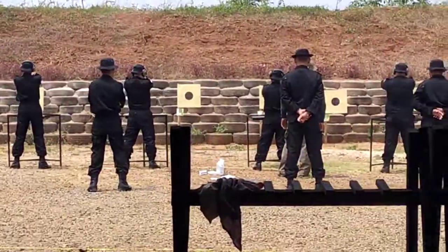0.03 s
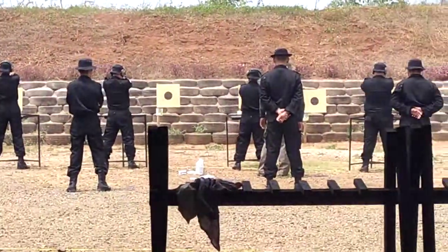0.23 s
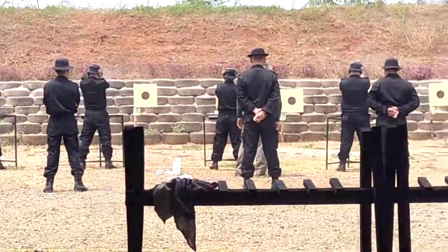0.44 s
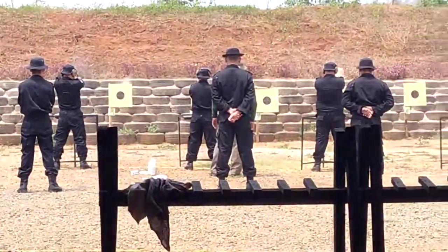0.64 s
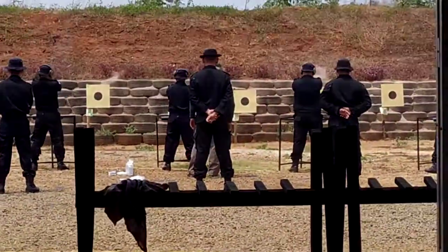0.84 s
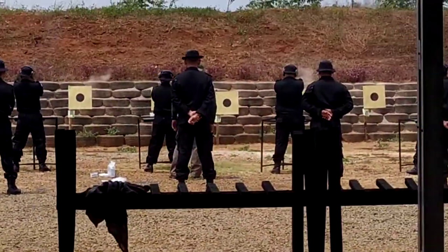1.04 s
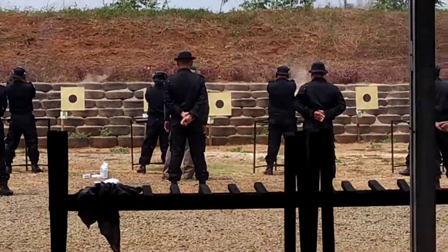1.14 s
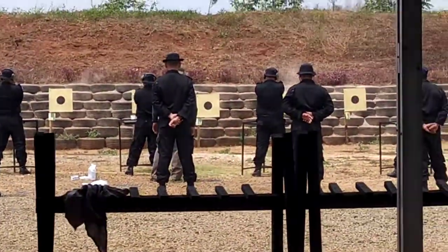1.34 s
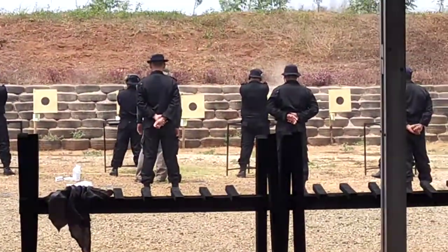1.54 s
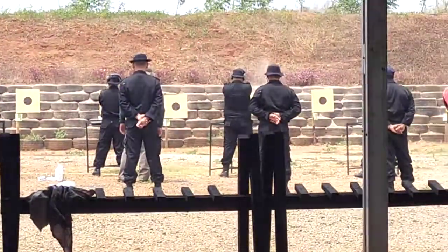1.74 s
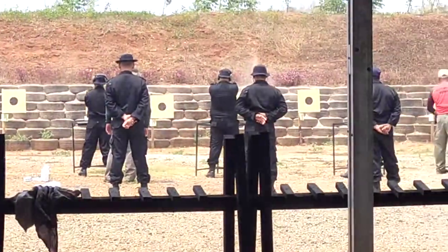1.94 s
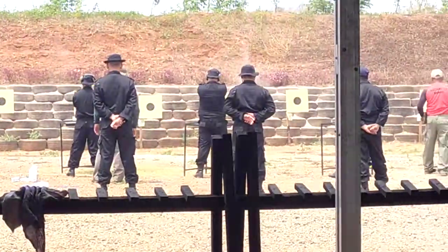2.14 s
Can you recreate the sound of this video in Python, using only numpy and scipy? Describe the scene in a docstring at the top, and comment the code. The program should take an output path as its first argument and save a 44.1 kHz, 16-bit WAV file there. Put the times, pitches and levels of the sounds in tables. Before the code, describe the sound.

Pistol shots at an outdoor range: quiet low rumble and a dying wash, then three overloaded cracks with booming thumps at about 0.23, 0.38 and 0.53 seconds. Each slaps back from the wall about 0.06 seconds later and rings the shelter. The tail fades by roughly 1 second into a low roll, with faint hiss, dull distant thuds from 1.1, thin pings, and small knocks near 1.5 and 1.7.

```python
"""Three quick pistol shots at an outdoor range, heard from under a shelter behind the firing line.
Each is a noise crack and boom with a swinging low thump; it slaps back from a stone wall and an earth bank,
rings the shelter as decaying sines and noise tails, and overloads the microphones. A low noise roll dies away.
Around them lie rumbling, faintly hissing air, dull far thuds, a few small knocks and thin metallic pings
built from paired sines."""
import sys
import numpy as np
from scipy import signal
from scipy.fft import rfft, irfft
from scipy.io import wavfile

SR = 44100
rng = np.random.default_rng(int(sys.argv[2]) if len(sys.argv) > 2 else 0)


def wav_out(sig):
    """Save sig, one row per channel (or a flat mono array), as 16-bit PCM at SR to the path in sys.argv[1]."""
    wavfile.write(sys.argv[1], SR, np.round(np.clip(np.atleast_2d(sig).T, -1, 1) * 32767).astype(np.int16))


N = 97020  # samples, 2.2 s

# half of a left-minus-right difference goes to each side: left [+0.5], right [-0.5]
SIDES = np.array([[.5], [-.5]])
# likeness of left and right in all noise: pitch_hz, likeness [0 to 1]
LIKENESS = [(50, 0.83), (130, 0.94), (290, .85), (640, .7), (1400, 0), (3000, 0)]

# outdoor rumble: pitch_hz, density_db [per Hz, relative]
AIR = [(18, -24), (30, -6.5), (50, 2.5), (110, -4.5), (190, -5), (340, -18.5), (570, -14.5), (1060, -25),
       (1700, -27.5), (5000, -32.5), (9300, -35.5), (15000, -44)]
# stereo tilt of the air: pitch_hz, left_minus_right_db
AIR_BALANCE = [(200, -1), (1600, 2), (5000, 4.5), (15000, 6.5)]
# swells of the faint treble hiss: time_s, level_db
HISS_LEVEL = [(0, -83), (.85, -81), (.98, -52.5), (1.08, -72.5), (1.16, -63.5), (1.28, -69.5),
              (1.46, -63.5), (1.56, -67.5), (1.83, -82), (1.92, -64), (2.08, -66.5), (2.2, -62)]
# hiss colour: pitch_hz, density_db [per Hz, relative]
HISS_COLOUR = [(1000, -25), (2500, 2.5), (8000, -1), (11000, -4), (15000, -10)]
# dull wash, already dying at the start: pitch_hz, density_db [per Hz, relative]
WASH = [(100, -20), (300, -3), (600, 0), (1000, -5), (1700, -14), (3000, -23.5), (8000, -41)]
AIR_DB, WASH_DB, WASH_T60_S = -52, -50.5, 0.41

# dull far thuds: start_s, level_db, top_hz, t60_s, push_db [relative to level_db]
THUDS = [(0.124, -50, 200, 0.09, 15), (1.079, -40.5, 400, 0.12, 7), (1.249, -42.5, 298.6, 0.12, 8),
         (1.265, -47.5, 675, 0.14, 10), (1.406, -49, 1370, 0.058, -3), (1.456, -51, 1418, .05, 1),
         (1.532, -44.5, 180, .13, -12), (1.712, -46.5, 840, 0.068, -2.5)]
THUD_PUSH_SHARE, THUD_PUSH_DECAY_S = 0.35, 0.0072  # push pitch as a share of top_hz; time constant

# pistol shots: start_s, level_db, thump_db, boom_db, bank_return_db [last three relative]
SHOTS = [(0.2325, 2, 2, -4, -12.5), (0.3794, 3.5, -1.5, -0.5, -9), (0.5279, -0.5, 0.5, -1.5, -5.5)]
# slaps from the stone wall: start_s, level_db [crack and tail], thump_db, thump_hz, thump_lag_s
SLAPS = [(0.2877, 0.5, -2.5, 213.1, .0105), (0.437, 0.5, -9, 154, 0.00025),
         (0.5854, -1.5, 1.5, 116, 0.0048)]
# blast crack: pitch_hz, density_db [per Hz, relative]
CRACK = [(60, -7.5), (250, -0.5), (900, -3.5), (3000, -6.5), (7000, -6.5), (15000, -15.5)]
# low body of the blast: pitch_hz, density_db [per Hz, relative]
BOOM = [(50, -21.5), (120, -8), (220, 1.5), (550, 2), (1000, -3), (1350, -19), (4000, -45)]
# roll over the open ground: pitch_hz, density_db [per Hz, relative]
ROLL = [(40, -9), (110, 0), (550, 1), (1200, -12.5), (4000, -18.5), (9000, -31.5), (15000, -45.5)]
# shelter reverberation: pitch_hz, density_db [per Hz, relative]
TAIL = [(30, -36), (60, -17.5), (120, -21.5), (230, -8), (520, 0.5), (1000, 1), (1400, -3), (3000, -1),
        (4600, -4), (7200, -3.5), (11000, -9), (15000, -16.5)]
# shelter decay: pitch_hz, t60_s
TAIL_T60 = [(100, 1), (400, 0.54), (1000, 0.47), (2800, .49), (7300, 0.44), (11000, 0.34), (13000, 0.38),
            (15500, .17)]
# shelter resonances: pitch_hz, level_db [relative]
RINGS = [(222, -6), (322, -12.5), (378, -6.5), (531, 5.5), (653, -1.5), (736, -4.5), (886, 4), (948, 2),
         (1027, -4), (1112, -11.5)]
# stereo tilt of the shots: pitch_hz, left_minus_right_db
SHOT_BALANCE = [(60, -2), (200, 0), (700, 2.5), (1400, 2), (3000, 3), (4500, 5), (8000, 6.5), (15000, 11.5)]
# levels here are relative to each shot or slap
CRACK_DB, CRACK_T60_S = 4.5, 0.035
THUMP_DB, THUMP_HZ, THUMP_DECAY_S = -2, 221, 0.0024
BOOM_DB, BOOM_T60_S = -6.5, 0.24
ROLL_DB, ROLL_T60_S, ROLL_RISE_S = -36, 2.136, 0.1
RING_DB, RING_T60_S = -22, 0.49
TAIL_DB, TAIL_RISE_S = -4.5, 0.003
LUMP_DB, LUMP_HZ = 1.5, 60.6  # rms depth and speed of the clumping in the tails
BANK_DELAY_S, BANK_RISE_S = 0.094, 0.0053
WALL_CRACK_DB, WALL_TAIL_DB, WALL_THUMP_DECAY_S = 4.5, -3.5, 0.003
EARLY_DB, EARLY_FROM_S, EARLY_TO_S = -8.5, 0.001, 0.028

# thin metallic pings, probably spent cases landing: start_s, level_db, pitch_hz, t60_s
PINGS = [(1.14, -62, 11250, 0.42), (1.441, -60, 11170, 0.38), (1.53, -68, 7340, 0.34),
         (1.567, -65, 5870, 0.44), (1.871, -73, 9040, 1.6), (1.95, -73, 9630, 1.6)]
PING_BEAT_HZ, PING_RISE_S, PING_PAN_DB = 69.5, 0.017, 15.5  # pan is left minus right

# small close knocks: start_s, level_db, pitch_hz, decay_s, overtone_db, tick_db, left_minus_right_db
KNOCKS = [(1.5312, -30.5, 410, 0.0014, -11, -9, -14.5), (1.5548, -39.5, 1110, 0.0017, -5, -3, 3),
          (1.7125, -43.5, 488, 0.0037, -10.5, -21, 6)]
# tick on each knock: pitch_hz, density_db [per Hz, relative]
KNOCK_TICK = [(200, 20.5), (2500, -7), (4400, -5), (5500, -17), (9000, -20)]
KNOCK_OVERTONE = 2.16  # ratio to the knock's pitch

# recorder colour: pitch_hz, gain_db
COLOUR = [(20, -20.5), (40, -6.5), (65, -3), (500, -1), (1000, 1), (2000, -0.5), (7000, 0), (11000, -2),
          (15000, -2.5)]
# recorder stereo tilt: pitch_hz, left_minus_right_db
RECORDER_BALANCE = [(200, 0.5), (700, -3.5), (2000, -0.5), (4500, -2.5), (8000, 3.5), (15000, -1)]
LIMIT_DB, LIMIT_SHARE = -3, 0.23  # threshold; share of the excess dB turned down
LIMIT_WINDOW_S, DETECTOR_FALL_DB_PER_S = 0.0013, 221.5
CLIP_DB, KNEE, EDGE_HZ = -3.5, 6, 15800  # overload ceiling, knee hardness, top of the band


def amp(db):
    """Decibels to gain."""
    return 10 ** (np.asarray(db) / 20)


def evened(x):
    """Scales to rms 1."""
    return x / np.sqrt(np.mean(x ** 2) + 1e-20)


def read(points, hz):
    """Reads a table on a log-frequency axis."""
    f, value = np.transpose(points)
    return np.interp(np.log(hz + 1), np.log(f + 1), value)


def add(mix, start_s, sound):
    """Mixes a sound in at a time, cut at the end of the scene."""
    part = mix[:, round(start_s * SR):][:, :sound.shape[-1]]
    part += sound[..., :part.shape[1]]


def noise(spectrum):
    """Coloured stereo noise, alike in the bass and unrelated in the treble."""
    hz = np.fft.rfftfreq(N, 1 / SR)
    left, other = rfft(rng.standard_normal((2, N)))
    same = np.clip(read(LIKENESS, hz), -1, 1)
    right = same * left + np.sqrt(1 - same ** 2) * other
    return evened(irfft(np.array([left, right]) * amp(read(spectrum, hz)), N))


def fade(t, t60_s):
    """Exponential decay, 60 dB down after t60_s."""
    return amp(-60 * t / t60_s)


def rise(t, rise_s):
    """Exponential onset towards full level."""
    return 1 - np.exp(-t / rise_s)


def push(t, hz, decay_s):
    """A pressure swing: a sine, negative first, under a quick exponential decay."""
    return -np.sin(2 * np.pi * hz * t) * np.exp(-t / decay_s)


def tint(x, db_of_hz, size=2048):
    """Causal minimum-phase filter with one gain curve per channel."""
    cepstrum = irfft(np.log(amp(db_of_hz(np.fft.rfftfreq(size, 1 / SR)))))
    # folding the cepstrum forward makes the response causal
    cepstrum[:, 1:size // 2] *= 2
    cepstrum[:, size // 2 + 1:] = 0
    response = irfft(np.exp(rfft(cepstrum)))
    return signal.fftconvolve(x, response, axes=1)[:, :N]


def air():
    """Steady outdoor rumble, a dying wash, and a faint hiss that comes and goes."""
    t = np.arange(N) / SR
    rumble = amp(AIR_DB) * noise(AIR)
    hiss = amp(np.interp(t, *np.transpose(HISS_LEVEL))) * noise(HISS_COLOUR)
    wash = amp(WASH_DB) * noise(WASH) * fade(t, WASH_T60_S)
    return tint(rumble + hiss + wash, lambda hz: SIDES * read(AIR_BALANCE, hz))


def thuds(rise_s=0.001):
    """Soft, dull bumps in the distance: a low pressure push and a puff of noise."""
    t, out = np.arange(N) / SR, np.zeros((2, N))
    for start_s, level_db, top_hz, t60_s, push_db in THUDS:
        spectrum = [(30, -18), (100, 0), (top_hz, 0), (top_hz * 2, -15), (top_hz * 10, -45)]
        puff = noise(spectrum) * fade(t, t60_s) * rise(t, rise_s)
        bump = amp(push_db) * push(t, top_hz * THUD_PUSH_SHARE, THUD_PUSH_DECAY_S)
        add(out, start_s, amp(level_db) * (puff + bump))
    return out


def crack(t):
    """The blast's sharp front: a short burst of noise."""
    return noise(CRACK) * fade(t, CRACK_T60_S)


def reverberation(rise_s):
    """Dense reflections that arrive in clumps, each band dying at its own rate."""
    hz, t, bands = signal.stft(noise(TAIL), SR, nperseg=512)
    decaying = bands * fade(t, read(TAIL_T60, hz)[:, None])
    tail = signal.istft(decaying, SR)[1][:, :N]
    slow = np.exp(-(np.fft.rfftfreq(N, 1 / SR) / LUMP_HZ) ** 2)
    lumps = evened(irfft(rfft(rng.standard_normal(N)) * slow, N))
    return tail * amp(LUMP_DB * lumps) * rise(np.arange(N) / SR, rise_s)


def shelter_ring(t):
    """Resonances of the shelter, struck by a blast: sines in random phase, decaying together."""
    phases = rng.uniform(0, 2 * np.pi, len(RINGS))
    ring = sum(amp(db) * np.sin(2 * np.pi * hz * t + p) for (hz, db), p in zip(RINGS, phases))
    return amp(RING_DB) * ring * fade(t, RING_T60_S) * rise(t, TAIL_RISE_S)


def ground_roll(t):
    """Low noise that swells behind the blast and dies slowly over the open ground."""
    return amp(ROLL_DB) * noise(ROLL) * fade(t, ROLL_T60_S) * rise(t, ROLL_RISE_S)


def early_reflections(x, count=14):
    """Roof, posts and ground add near copies, the same for every shot; they comb the spectrum."""
    delay_s = rng.uniform(EARLY_FROM_S, EARLY_TO_S, (3, count, 1))
    polarity = rng.choice([-1., 1.], delay_s.shape)
    hz = np.fft.rfftfreq(N, 1 / SR)
    echoes = polarity * np.exp(-2j * np.pi * hz * delay_s)
    both, left, right = echoes.sum(1) / np.sqrt(count)
    same = np.clip(read(LIKENESS, hz), 0, 1)
    taps = np.sqrt(same) * both + np.sqrt(1 - same) * np.array([left, right])
    return irfft(rfft(x) * (1 + amp(EARLY_DB) * taps), N) / np.sqrt(1 + amp(EARLY_DB) ** 2)


def wall_slaps(near, low):
    """The stone wall returns a crack with its tail, and a separately timed thump."""
    t = np.arange(N) / SR
    for start_s, level_db, thump_db, thump_hz, lag_s in SLAPS:
        slap = amp(WALL_CRACK_DB) * crack(t) + amp(WALL_TAIL_DB) * reverberation(TAIL_RISE_S)
        add(near, start_s, amp(level_db) * slap)
        add(low, start_s + lag_s, amp(thump_db) * push(t, thump_hz, WALL_THUMP_DECAY_S))


def pistols():
    """Each blast cracks, thumps and booms, rings the shelter, and returns from the wall and the earth bank."""
    t = np.arange(N) / SR
    near, low = np.zeros((2, N)), np.zeros((2, N))  # only near gets the early reflections
    for start_s, level_db, thump_db, boom_db, bank_db in SHOTS:
        blast = amp(CRACK_DB) * crack(t) + amp(TAIL_DB) * reverberation(TAIL_RISE_S)
        add(near, start_s, amp(level_db) * blast)
        bank_return = amp(level_db + bank_db) * reverberation(BANK_RISE_S)
        add(near, start_s + BANK_DELAY_S, bank_return)
        thump = amp(THUMP_DB + thump_db) * push(t, THUMP_HZ, THUMP_DECAY_S)
        boom = amp(BOOM_DB + boom_db) * noise(BOOM) * fade(t, BOOM_T60_S)
        add(low, start_s, amp(level_db) * (thump + boom + shelter_ring(t) + ground_roll(t)))
    wall_slaps(near, low)
    return tint(early_reflections(near) + low, lambda hz: SIDES * read(SHOT_BALANCE, hz))


def pings():
    """Small brass tubes ring on a close pair of modes, which beat together."""
    t, out = np.arange(SR) / SR, np.zeros((2, N))
    for start_s, level_db, hz, t60_s in PINGS:
        pair = np.sin(2 * np.pi * hz * t) + 0.5 * np.sin(2 * np.pi * (hz - PING_BEAT_HZ) * t)
        ping = pair * fade(t, t60_s) * rise(t, PING_RISE_S)
        add(out, start_s, amp(level_db + SIDES * PING_PAN_DB) * ping)
    return out


def knocks():
    """Short dry knocks near the microphones: two damped modes and a tick of noise."""
    t, out = np.arange(SR // 10) / SR, np.zeros((2, N))
    for start_s, level_db, hz, decay_s, overtone_db, tick_db, pan_db in KNOCKS:
        tick = amp(tick_db) * noise(KNOCK_TICK)[:, :len(t)] * np.exp(-t / decay_s)
        overtone = amp(overtone_db) * push(t, hz * KNOCK_OVERTONE, decay_s)
        body = push(t, hz, decay_s) + overtone
        add(out, start_s, amp(level_db + SIDES * pan_db) * (body + tick))
    return out


def scene():
    """The open air, shots and small sounds."""
    return air() + thuds() + pistols() + pings() + knocks()


def record(dry):
    """A fast limiter on each channel, overload, the recorder's colour and its band limit."""
    r = np.exp(-1 / (LIMIT_WINDOW_S * SR))
    power_db = 10 * np.log10(signal.lfilter([1 - r], [1, -r], dry ** 2) + 1e-12)
    # the detector jumps up with the power and falls at a steady rate
    fall_db = np.arange(N) * DETECTOR_FALL_DB_PER_S / SR
    held_db = np.maximum.accumulate(power_db + fall_db, axis=1) - fall_db
    over_db = np.maximum(held_db - LIMIT_DB, 0)
    limited = dry / amp(LIMIT_SHARE * over_db)
    overloaded = limited / (1 + abs(limited / amp(CLIP_DB)) ** KNEE) ** (1 / KNEE)
    coloured = tint(overloaded, lambda hz: read(COLOUR, hz) + SIDES * read(RECORDER_BALANCE, hz))
    low_pass = signal.firwin(511, EDGE_HZ, window=("kaiser", 8), fs=SR)
    return signal.oaconvolve(np.clip(coloured, -1, 1), low_pass[None], "same")


dry = scene()
out = record(dry)
wav_out(out)
```